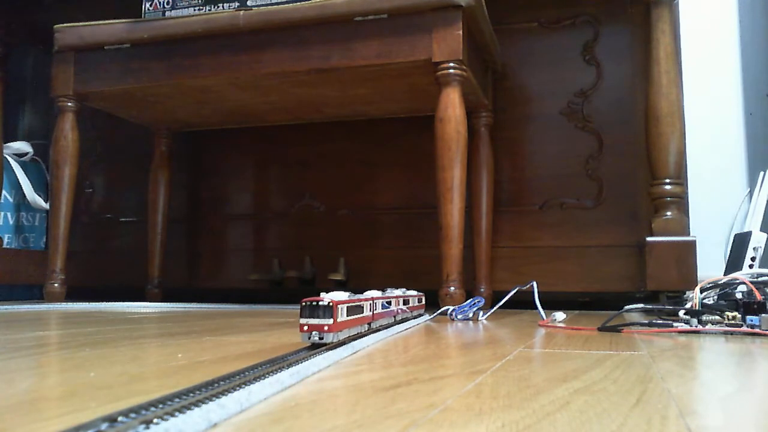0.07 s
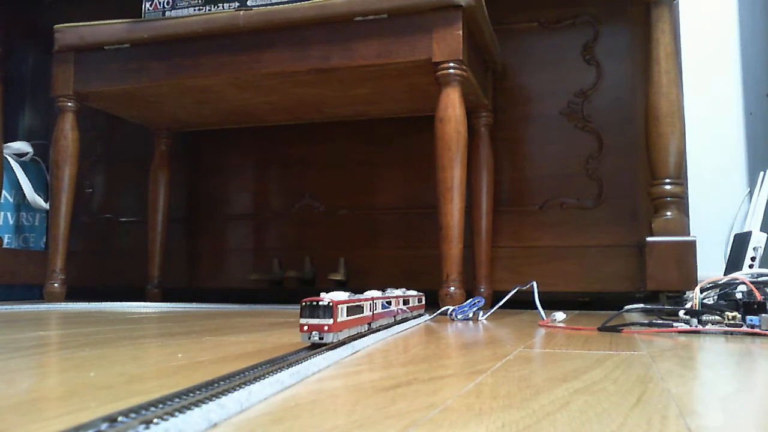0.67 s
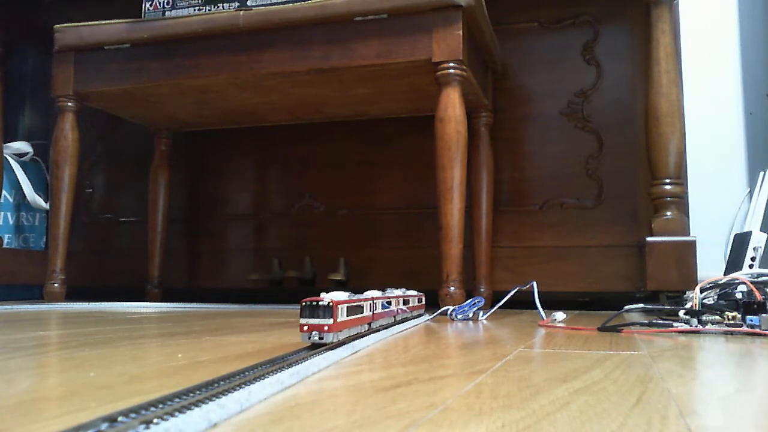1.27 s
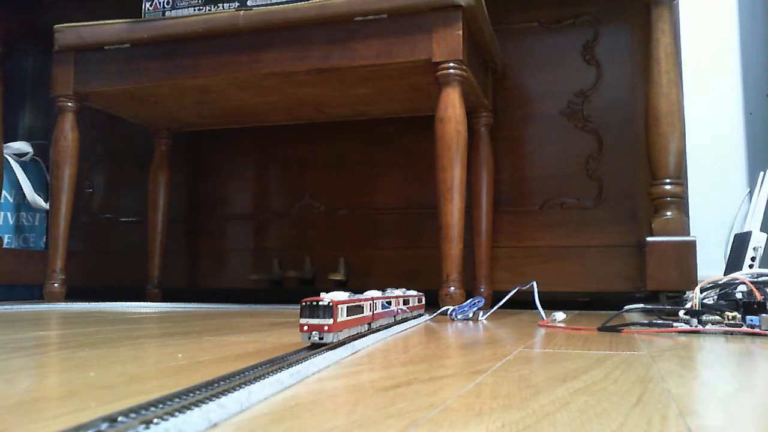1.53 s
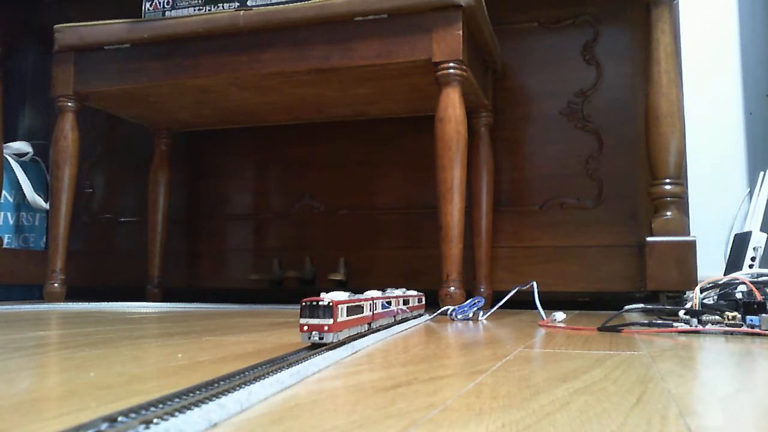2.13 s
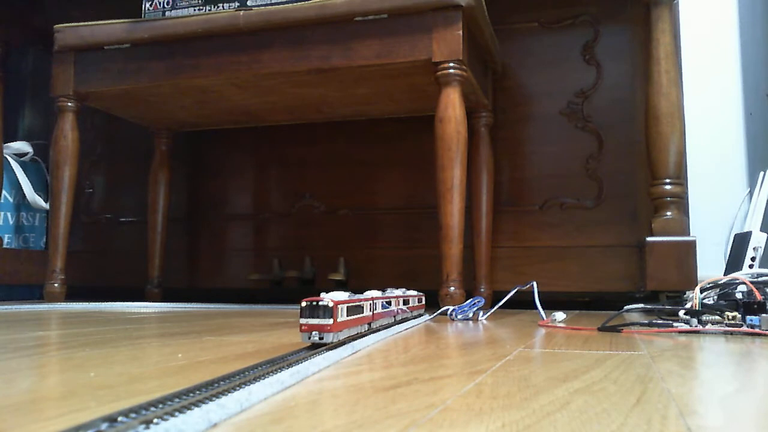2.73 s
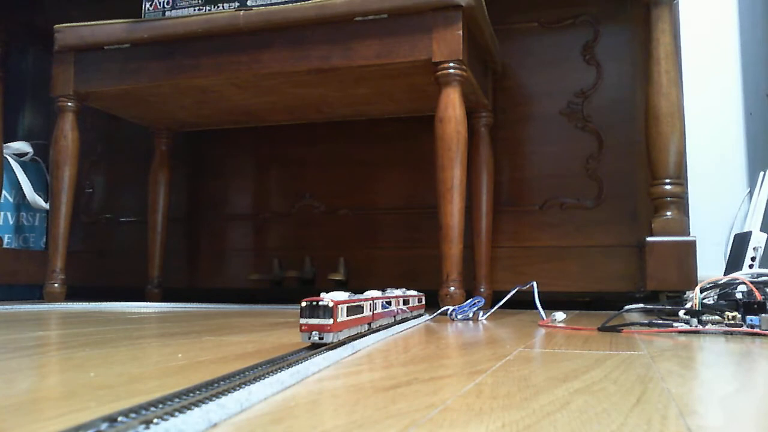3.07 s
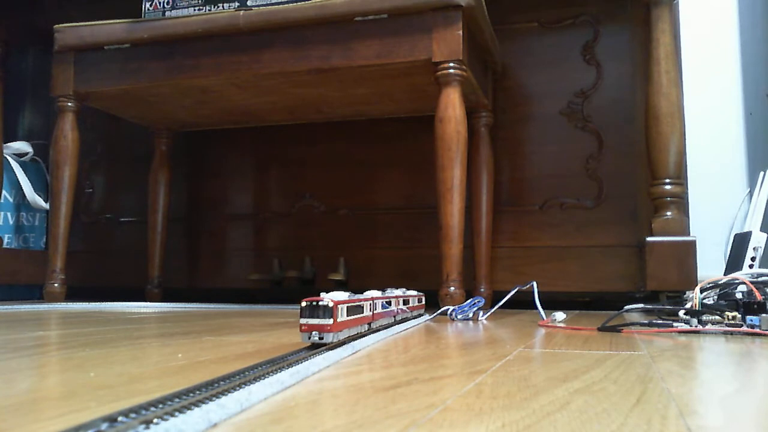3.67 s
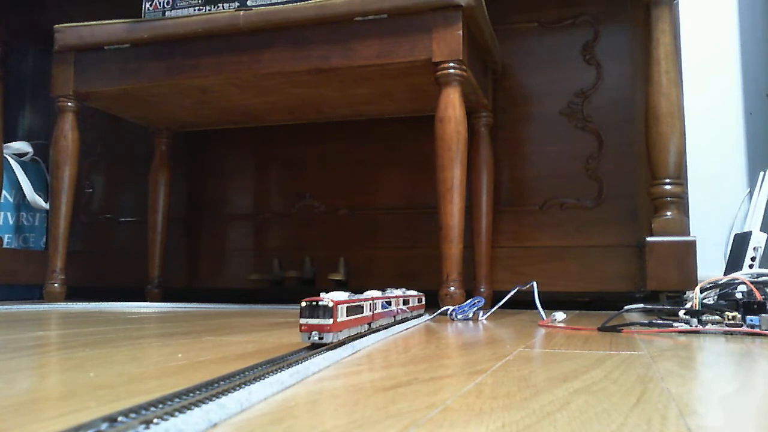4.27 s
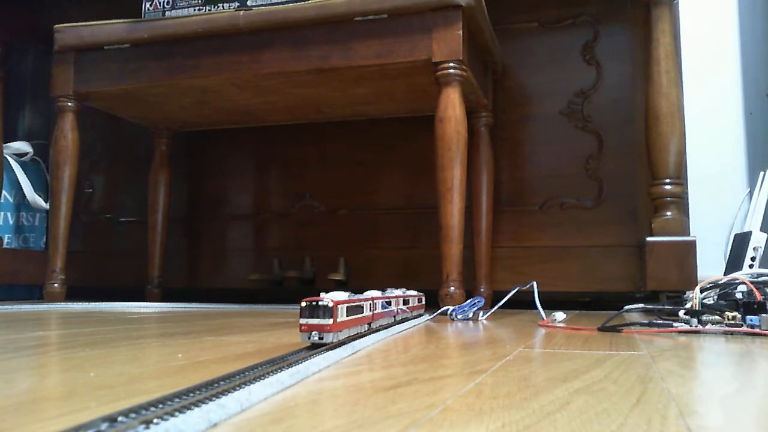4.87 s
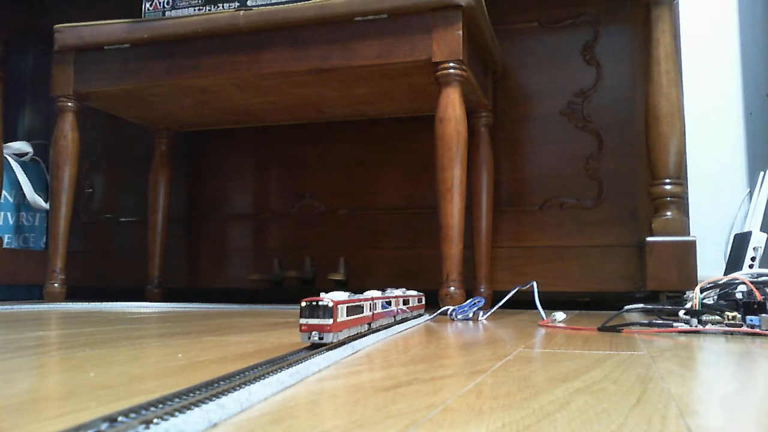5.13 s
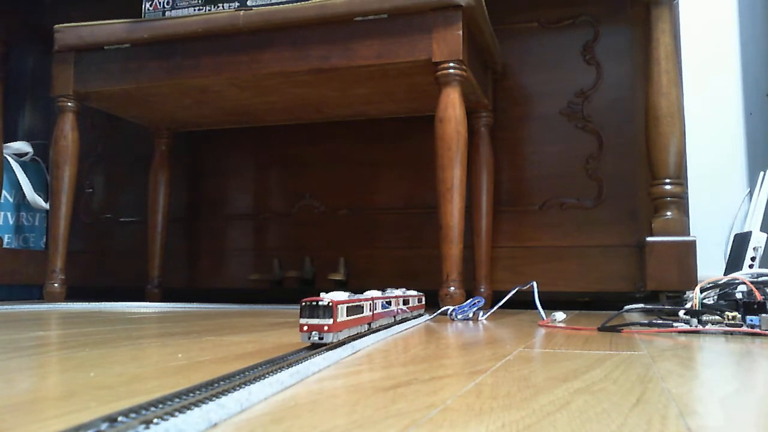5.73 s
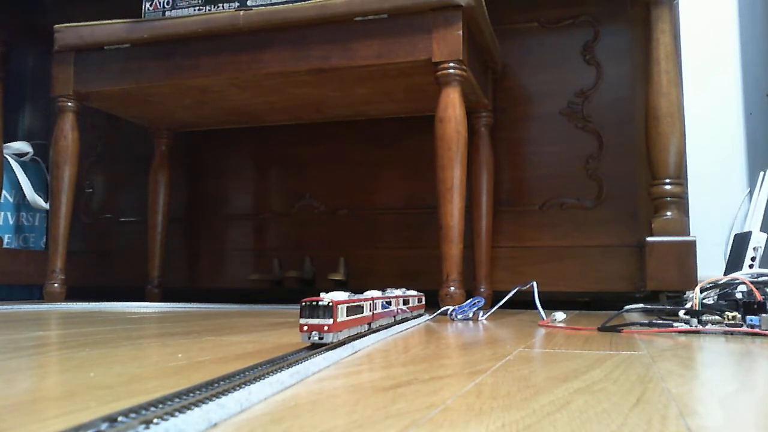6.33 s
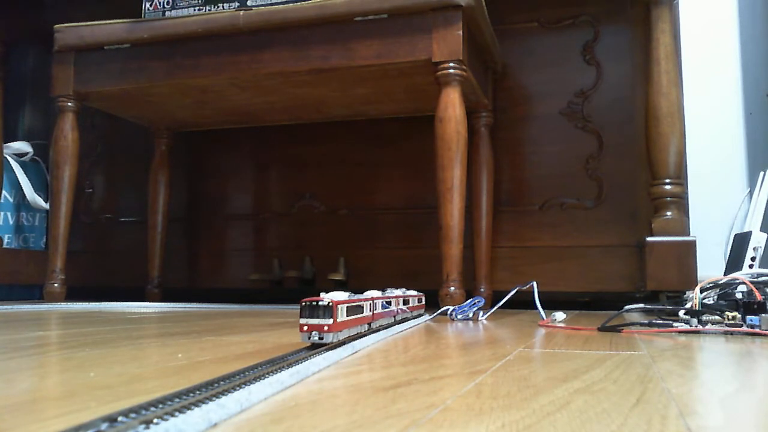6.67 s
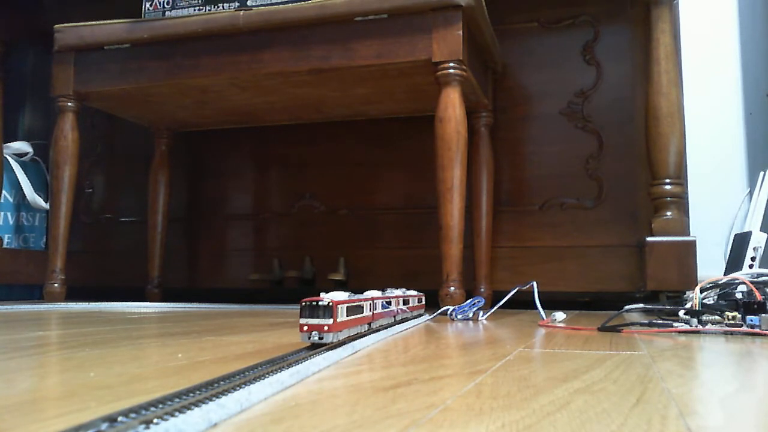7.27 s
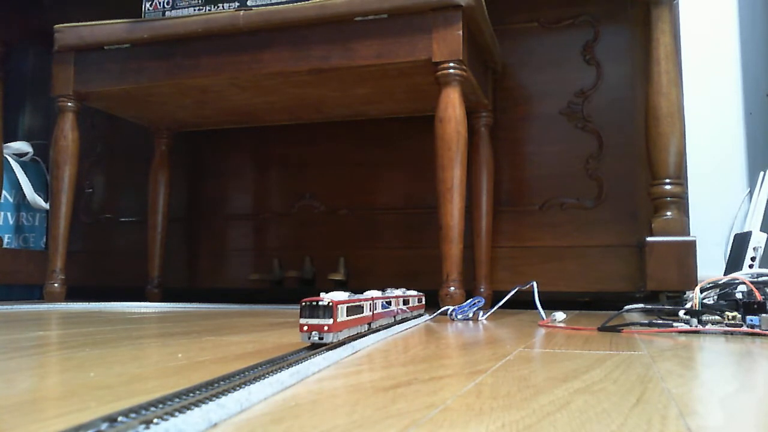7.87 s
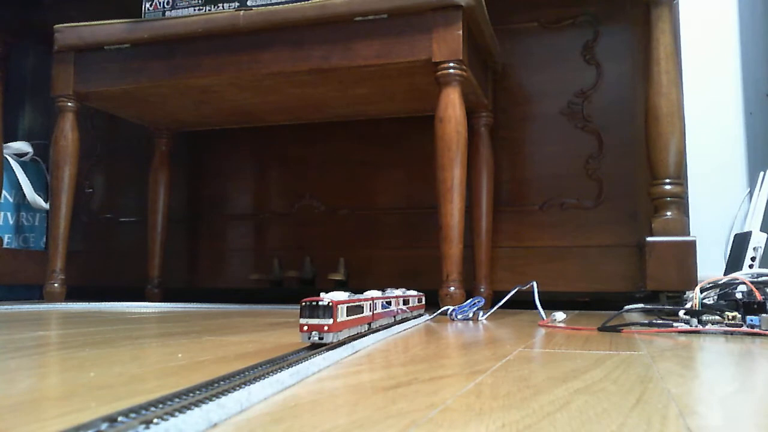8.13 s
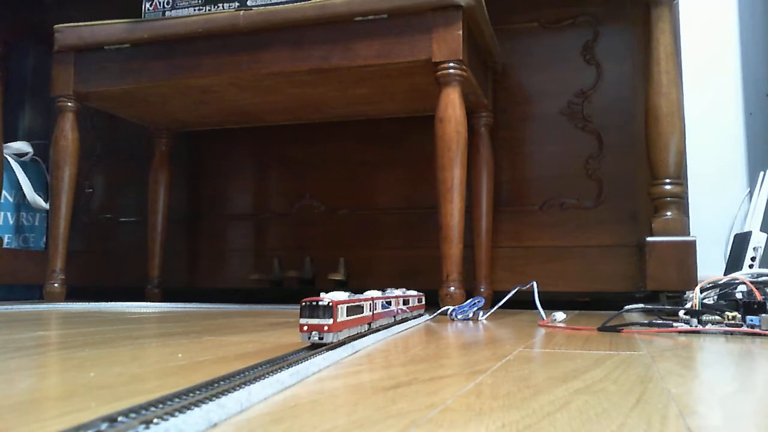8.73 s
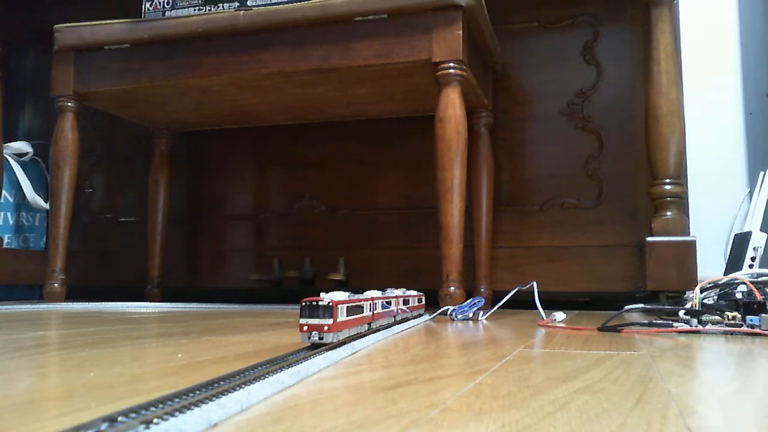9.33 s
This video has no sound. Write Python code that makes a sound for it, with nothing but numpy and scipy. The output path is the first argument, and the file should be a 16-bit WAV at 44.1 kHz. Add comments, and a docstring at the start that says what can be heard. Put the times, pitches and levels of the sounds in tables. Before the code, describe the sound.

The soft electric buzz of a standing model train shifts its tone in steps, while controls click and low bumps pass through floorboards.

```python
"""A steady buzz fills a quiet room with a wooden floor. Sharp pulses ring a set of resonances, and the colour
changes in steps with the pulse shape; a switching circuit adds a thin whine. Small controls click a little way
off, a hand shifts the controller, and soft bumps travel through the floorboards. Behind it all, appliances hum
faintly over room rumble, hiss and a distant fan."""
import sys
import numpy as np
from scipy import signal
from scipy.fft import rfft, irfft
from scipy.io import wavfile
from scipy.ndimage import uniform_filter1d

SR = 44100
rng = np.random.default_rng(int(sys.argv[2]) if len(sys.argv) > 2 else 0)


def waveform_to_disk(signal):
    """Save audio, clipped to [-1, 1], as 16-bit WAV at the path in sys.argv[1]."""
    frames = np.transpose(np.atleast_2d(signal))
    scaled = np.clip(frames, -1, 1) * 32767
    samples = np.round(scaled).astype(np.int16)
    wavfile.write(sys.argv[1], SR, samples)


N = 418950


def undb(db):
    """Decibels to gain."""
    return 10 ** (np.asarray(db) / 20)


def unit(x):
    """Scale to rms 1."""
    return x / np.sqrt(np.mean(x ** 2))


def colour(hz, points):
    """Gain of an EQ curve drawn through (Hz, dB) points on a log-frequency axis."""
    at, db = np.transpose(points)
    return undb(np.interp(np.log(hz + 1e-3), np.log(at), db))


def resonance(hz, centre, width):
    """Complex response of one resonance, gain 1 at its centre."""
    return 1 / (1 + 2j * (hz - centre) / width)


def ringing(hz, modes):
    """Gain of a few unrelated resonances with steep skirts."""
    return np.sqrt(sum(undb(db) ** 2 * np.abs(resonance(hz, f, 1.59 * w)) ** 4 for f, w, db in modes))


def struck_phase(gain):
    """Phase of the sharpest causal pulse with this spectrum."""
    cepstrum = irfft(np.log(gain + 1e-7))
    return 2 * rfft(cepstrum[:len(cepstrum) // 2], len(cepstrum)).imag


def noise(gain, size):
    """Random noise with the given gain at each frequency."""
    return irfft(rfft(rng.standard_normal(size)) * gain, size)


def wander(rate_hz, size=N):
    """Smooth random modulation, rms 1, moving at up to about rate_hz."""
    hz = np.fft.rfftfreq(size, 1 / SR)
    return unit(noise(np.exp(-(hz / rate_hz) ** 2), size))


def room_tone(fan_sway_db=1.0):
    """An even bed of rumble and hiss, with the wavering bands of a distant fan."""
    # Rumble and hiss. Each row: frequency in Hz, noise density in dB per Hz.
    bed_curve = [(20, -63), (45, -59.5), (80, -66.5), (145, -71.5), (260, -75.5), (420, -77), (660, -82),
                 (1000, -82.5), (1450, -88.5), (2800, -88.5), (5000, -91), (9400, -91), (11500, -92.5),
                 (15300, -90.5)]
    # The fan. Each row: centre in Hz, width in Hz, noise density in dB per Hz.
    fan_bands = [(517.6, 39, -75), (1175, 48.5, -74.5)]
    hz = np.fft.rfftfreq(N, 1 / SR)
    bed = noise(colour(hz, bed_curve) * hz / np.hypot(hz, 8), N)  # low cut at 8 Hz
    fan = noise(ringing(hz, fan_bands), N) * undb(-fan_sway_db * wander(7.2))
    return np.sqrt(SR / 2) * (bed + fan)


def appliance_hum(sway_db=1.33):
    """Low appliance tones waver in pitch and level."""
    # Each row: pitch in Hz, level in dB, depth of the pitch waver in Hz.
    tones = [(92.8, -54, 2.45), (120.95, -49.5, 0.867), (172, -54.5, 1.59), (189.8, -50, 1.128),
             (219.8, -58, 2.96), (493.3, -60.5, 4.87)]
    out = 0
    for hz, db, waver_hz in tones:
        phase = 2 * np.pi * np.cumsum(hz + waver_hz * wander(7.37)) / SR
        out += np.sqrt(2) * undb(db + sway_db * wander(4.2)) * np.sin(phase)
    return out


def floor_bumps(t60=0.36, rise_s=0.0047, thud_db=-12, thud_hz=150):
    """The floorboards swing for a few cycles after each bump, with a dull thud on top."""
    # Each row: start in seconds, level in dB, pitch of the boards in Hz.
    bumps = [(1.05, -30.5, 63.4), (2.346, -28.5, 63.5), (2.46, -28, 53.6), (2.722, -30.5, 58),
             (2.815, -31, 64.6), (5.308, -30, 54.6), (5.5, -34, 61), (8.474, -28, 48.5), (8.785, -26, 45.5)]
    out = np.zeros(N + SR)
    size = SR // 2
    hz, t = np.fft.rfftfreq(size, 1 / SR), np.arange(size) / SR
    for start_s, db, swing_hz in bumps:
        thud = undb(thud_db) * unit(noise(1 / (1 + (hz / thud_hz) ** 2), size))
        envelope = undb(db - 60 * t / t60) * (1 - np.exp(-t / rise_s))
        start = int(start_s * SR)
        out[start:start + size] += envelope * (thud - np.sin(2 * np.pi * swing_hz * t))
    return out[:N]


def controller_rub(fade_s=0.078, grain_db=3):
    """A hand shifts the controller on the floor: each shove is a dull, grainy rub that swells and dies."""
    # Each row: peak time in seconds, swell in seconds, level in dB.
    shoves = [(2.55, .025, -45), (2.70, .04, -51), (2.835, .04, -39), (5.53, .08, -48)]
    hz, t = np.fft.rfftfreq(N, 1 / SR), np.arange(N) / SR
    dull = colour(hz, [(40, -8), (140, 3), (350, -9.5), (600, -10), (1500, -17), (6000, -49)])
    rub = unit(noise(dull, N))
    effort = sum(undb(db) * np.exp(np.minimum((t - peak_s) / swell_s, (peak_s - t) / fade_s))
                 for peak_s, swell_s, db in shoves)
    return rub * effort * undb(grain_db * wander(30))


def control_clicks(contact_fall_s=0.021, knock_fall_s=0.034, room_t60=0.25, room_db=-14,
                   body_trim_db=2, shell_trim_db=1, snap_trim_db=2.5, grain_db=2, size=16384):
    """A contact scrapes up to its snap: the case knocks, its shell rattles, the room rings briefly."""
    # Each row: peak time in seconds, rise in seconds, body pitch in Hz,
    # then body, shell and snap levels in dB before their trims.
    clicks = [(.368, .014, 820, -46.5, -58, -50.5), (1.054, 0.0047, 700, -43, -36.5, -46),
              (1.163, 0.0083, 850, -43, -38, -46), (2.531, .009, 540, -40, -50, -50),
              (2.556, .006, 794, -47, -40, -38), (2.682, 0.012, 510, -41, -45, -50),
              (2.825, 0.015, 827, -42.5, -43, -45), (5.453, .007, 800, -49, -52, -50),
              (6.135, 0.013, 476, -44, -44, -47), (6.484, 0.0089, 806, -43, -57, -52),
              (7.463, 0.02, 1000, -38.5, -42, -44), (7.607, .005, 780, -60, -47, -52),
              (7.882, .008, 820, -48.5, -54, -48.5), (7.954, .004, 910, -60, -48, -47),
              (8.229, .007, 820, -50, -50, -43.5), (8.32, .016, 870, -45.5, -50, -47),
              (8.480, 0.0064, 790, -42, -45, -32.5), (8.559, .008, 774, -47.5, -46.5, -40.5),
              (8.708, .004, 480, -48, -48.5, -61), (9.212, .009, 990, -48, -58, -63)]
    # Rings of the plastic shell and the contact. Each row: centre in Hz, width in Hz, relative dB.
    shell_modes = [(2020, 220, 2), (2650, 450, -1), (3300, 400, -1)]
    snap_modes = [(3660, 1300, 3), (5300, 1160, 2), (7350, 1550, 1.5), (9300, 1160, -0.5),
                  (12600, 4000, -10.5)]
    out = np.zeros(N + size)
    lead = size // 4
    hz, t = np.fft.rfftfreq(size, 1 / SR), (np.arange(size) - lead) / SR
    before, after = np.minimum(t, 0), np.maximum(t, 0)
    room_tail = undb(room_db - 60 * after / room_t60)
    contact_decay = np.hypot(np.exp(-after / contact_fall_s), room_tail)
    knock_decay = np.hypot(np.exp(-after / knock_fall_s), room_tail)
    case = colour(hz, [(150, -46), (320, -14), (520, -14), (1200, -12), (1600, -20), (2500, -45)])
    for peak_s, rise_s, body_hz, body_db, shell_db, snap_db in clicks:
        body = np.abs(resonance(hz, body_hz, width=115)) ** 2
        knock = unit(noise(np.hypot(body, case), size)) * undb(body_db + body_trim_db)
        rattle = unit(noise(ringing(hz, shell_modes), size)) * undb(shell_db + shell_trim_db)
        snap = unit(noise(ringing(hz, snap_modes), size)) * undb(snap_db + snap_trim_db)
        contact = (rattle + snap) * undb(grain_db * wander(350, size))
        attack = np.exp(before / rise_s)
        start = int(peak_s * SR) - lead
        out[start:start + size] += attack * (knock_decay * knock + contact_decay * contact)
    return out[:N]


def circuit_whine(hz=13500.5, db=-66.5):
    """A switching circuit sings one thin, steady tone."""
    return np.sqrt(2) * undb(db) * np.sin(2 * np.pi * hz * np.arange(N) / SR)


def pulse_buzz(pulse_hz=66.3, lag_ms=0.4015, crossfade_s=0.013, flutter_db=0.46,
               treble_db=0.27, uneven_db=2.2, low_hz=280, top_hz=10300, size=4096):
    """Each pulse rings the same resonances, making a comb of steady harmonics."""
    # Steps of the buzz. Each row: start in seconds, pulse shape (0 to 3), smear of the pulse in ms.
    steps = [(0, 0, 1.5), (2.58, 2, 1.1), (2.86, 1, 1.1), (4.85, 2, 1.3), (5.48, 3, 2)]
    # Resonances rung by the pulses. Each row: centre in Hz, width in Hz,
    # then a level in dB for each of the four pulse shapes, before the bass and treble roll-offs.
    buzz_modes = [(418, 154, -67, -64, -62, -70), (662, 11, -62, -54, -53, -65),
                  (785, 96, -57, -58, -55, -57), (856, 29, -60, -55, -54, -55),
                  (928, 62, -57, -56, -59, -57), (972, 244, -59, -60, -55, -80),
                  (1321, 19, -65, -58, -57, -76), (1465, 15, -62, -56, -53, -65),
                  (1544, 29, -67, -55, -54, -62), (1644, 45, -61, -65, -66, -60),
                  (1723, 18, -59, -63, -60, -60), (1827, 66, -69, -57, -56, -63),
                  (2232, 72, -66, -63, -64, -66), (2653, 115, -65, -59, -56, -67),
                  (2746, 62, -60, -52, -53, -67), (2848, 118, -62, -58, -58, -62),
                  (3307, 276, -72, -70, -65, -68), (3640, 131, -67, -65, -64, -69),
                  (4073, 81, -65, -66, -61, -64), (4300, 78, -67, -63, -64, -67),
                  (4537, 76, -71, -74, -69, -68), (4737, 177, -67, -71, -65, -72),
                  (5243, 1219, -75, -73, -72, -73), (5510, 283, -68, -68, -64, -87),
                  (6251, 68, -69, -71, -66, -81), (6514, 140, -73, -67, -63, -67),
                  (6741, 383, -73, -72, -70, -79), (7574, 720, -77, -75, -69, -77),
                  (9312, 2885, -83, -84, -106, -81)]
    # Room echoes scatter the phases, most in the bass. Each row: frequency in Hz, scatter in radians.
    echo_scatter = [(900, 1.4), (1600, .85), (2800, .6), (7000, .35)]
    t = np.arange(N) / SR
    hz = np.arange(170) * pulse_hz
    modes = np.array([(-1) ** k * resonance(hz, *row[:2]) for k, row in enumerate(buzz_modes)])
    shape_gains = undb([row[2:] for row in buzz_modes])
    radiated = hz ** 4 / (hz ** 4 + low_hz ** 4) / (1 + (hz / top_hz) ** 16)  # tiny parts lack bass
    treble = np.interp(hz, [2700, 3400], [0, 1])
    scatter = np.interp(hz, *np.transpose(echo_scatter))
    switched = [np.clip((t - start_s) / crossfade_s + 1, 0, 1) for start_s, _, _ in steps] + [0]
    out = 0
    for k, (_, shape, smear_ms) in enumerate(steps):
        spread, echo, uneven = rng.standard_normal((len(hz), 3)).T
        gain = np.abs(shape_gains[:, shape] @ modes) * radiated
        # the bands arrive a little apart, and room echoes fill the gaps between pulses
        delay_s = (lag_ms + smear_ms * uniform_filter1d(spread, size=5)) / 1000
        phase = struck_phase(gain) - 2 * np.pi * pulse_hz * np.cumsum(delay_s) + echo * scatter
        # reflections lift some high harmonics and lower others
        reflections = undb(treble * (treble_db + uneven_db * uneven))
        cycle = irfft(gain * reflections * np.exp(1j * phase), size) * size / np.sqrt(2)
        looped = np.interp(t * pulse_hz % 1, np.arange(size) / size, cycle)
        out += (switched[k] - switched[k + 1]) * looped
    return out * undb(flutter_db * wander(11))


def scene():
    """Mono mix of the buzz, the house and the handling noises, heard from the floor."""
    mix = pulse_buzz() + circuit_whine() + appliance_hum() + room_tone()
    mix += control_clicks() + controller_rub() + floor_bumps()
    return mix[None]


def record(dry, top_hz=15750, dc_offset=-0.2002):
    """A steep low-pass cuts the top, and the waveform rests off centre."""
    lowpass = signal.ellip(12, 0.1, 80, top_hz, fs=SR, output="sos")
    return signal.sosfilt(lowpass, dry) + dc_offset


dry = scene()
out = record(dry)
waveform_to_disk(out)
```